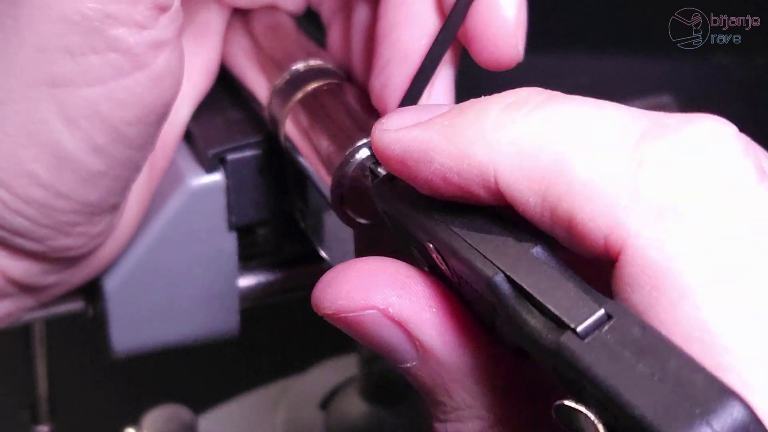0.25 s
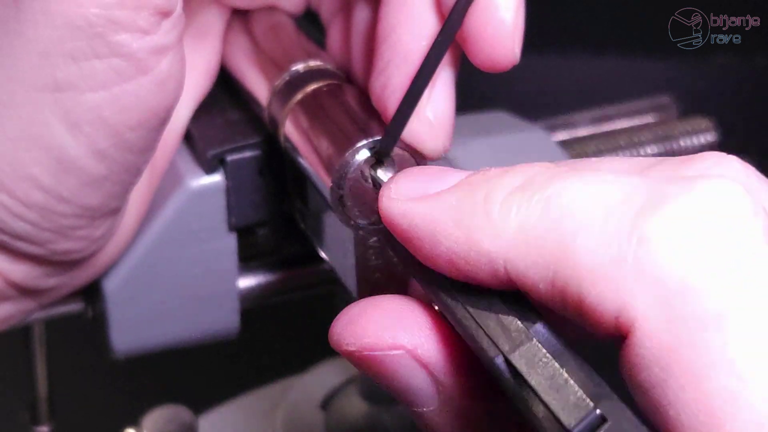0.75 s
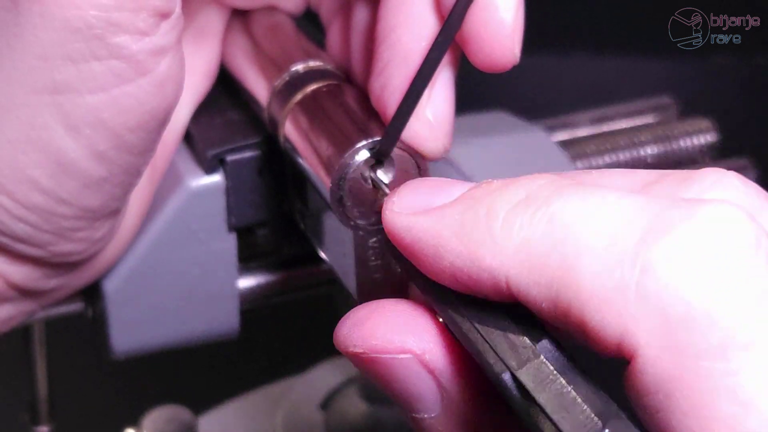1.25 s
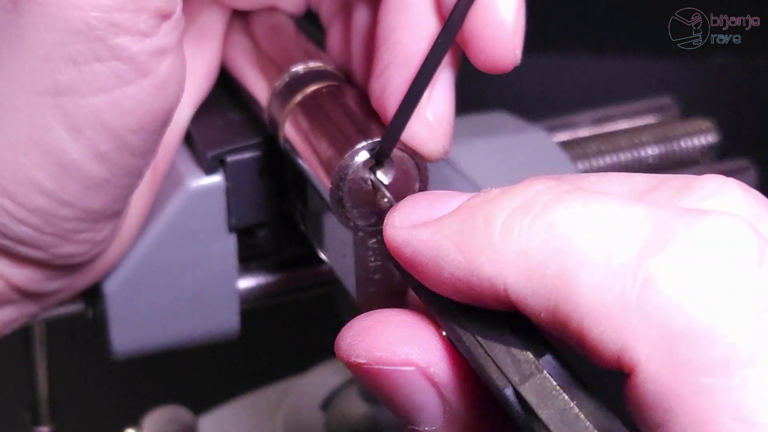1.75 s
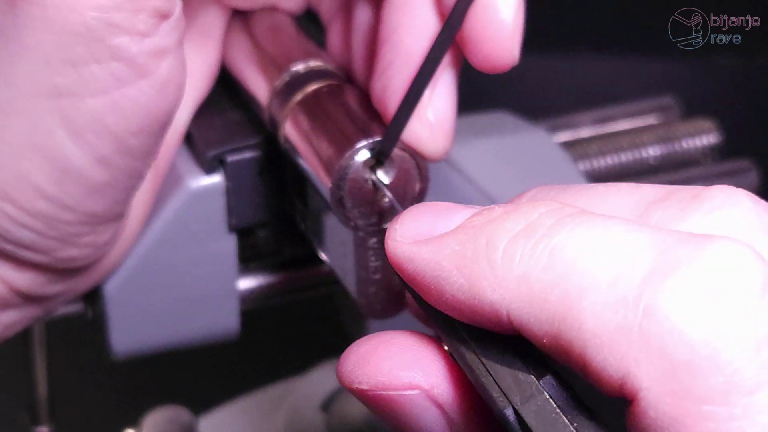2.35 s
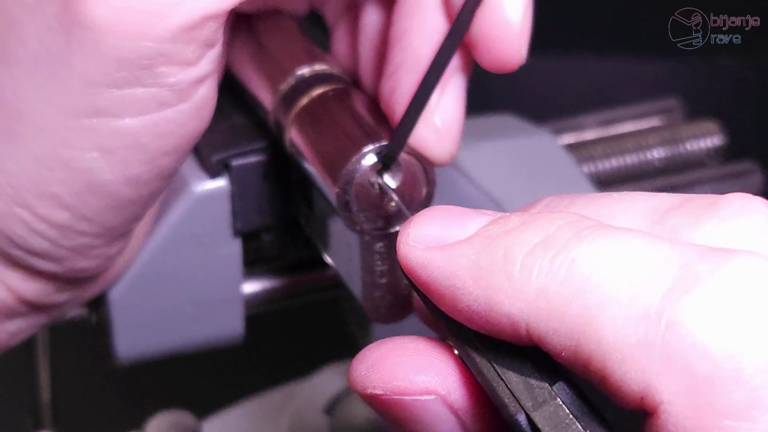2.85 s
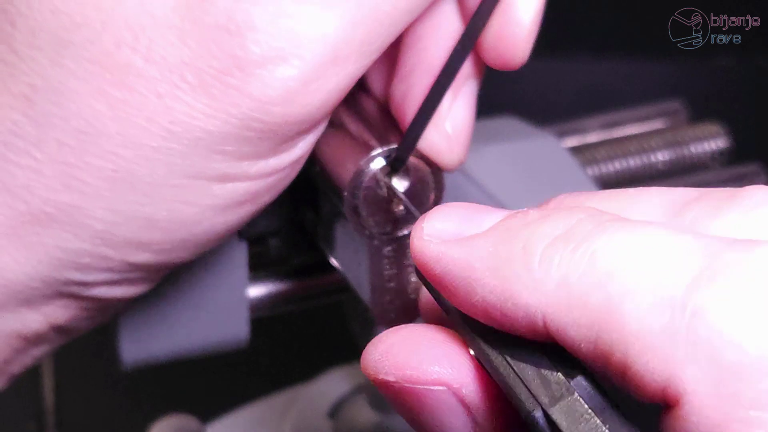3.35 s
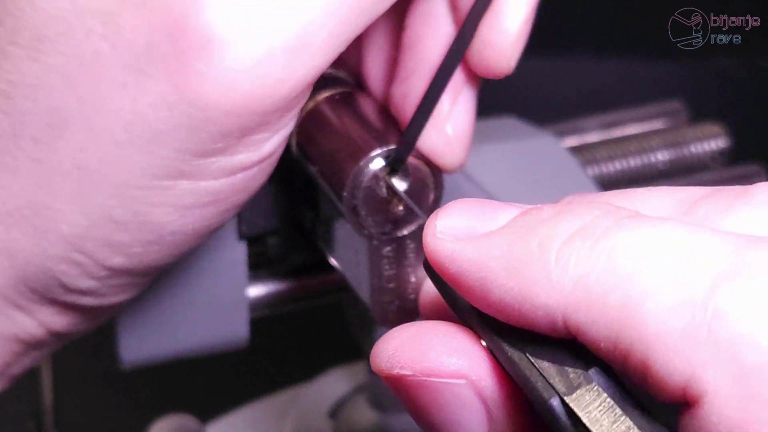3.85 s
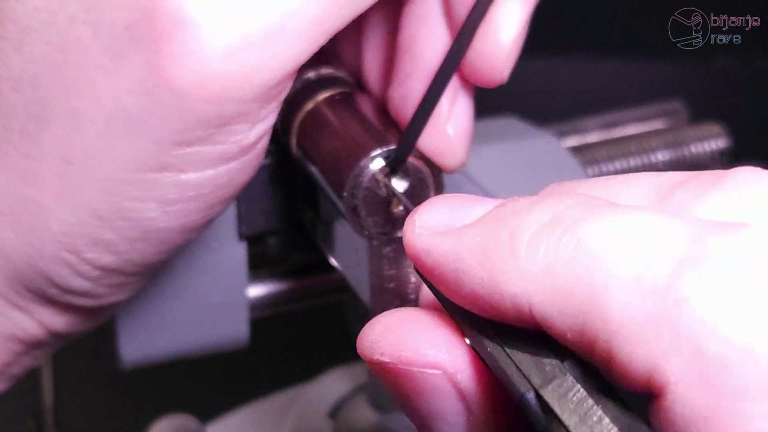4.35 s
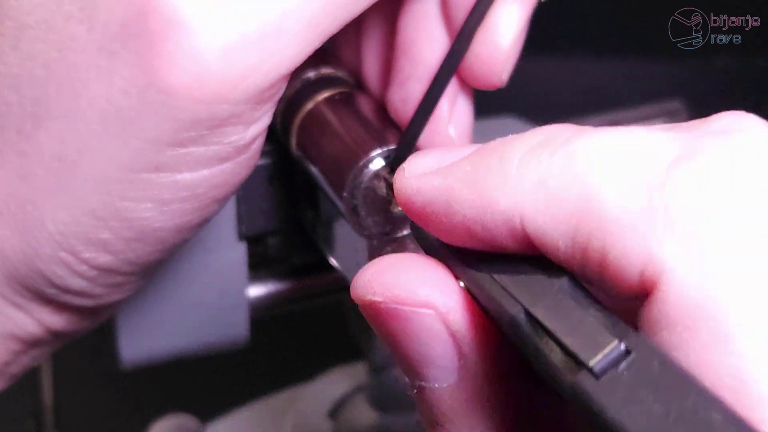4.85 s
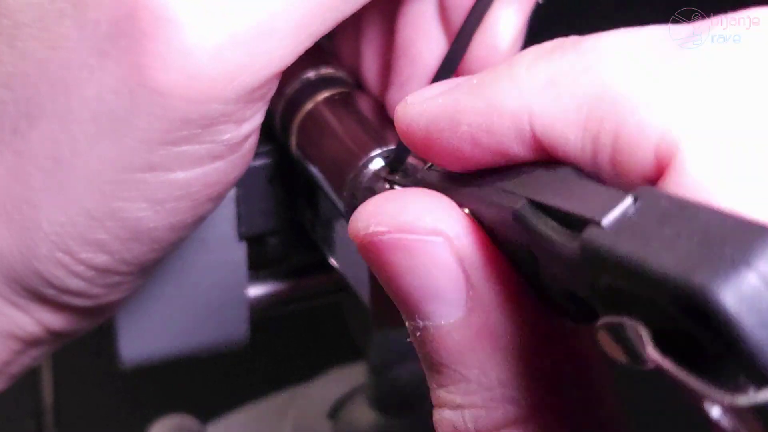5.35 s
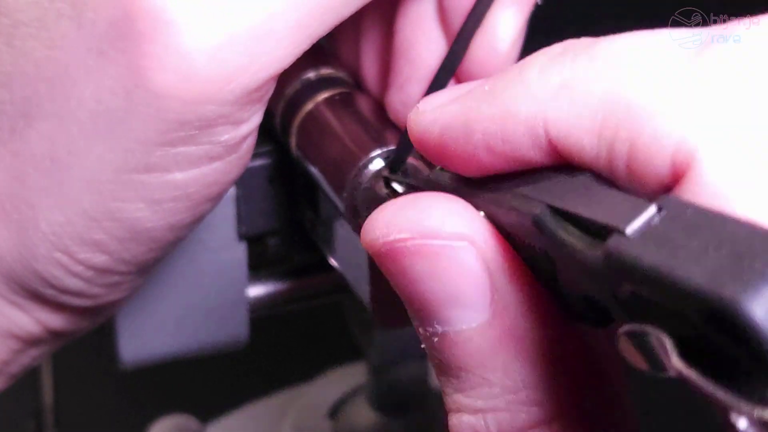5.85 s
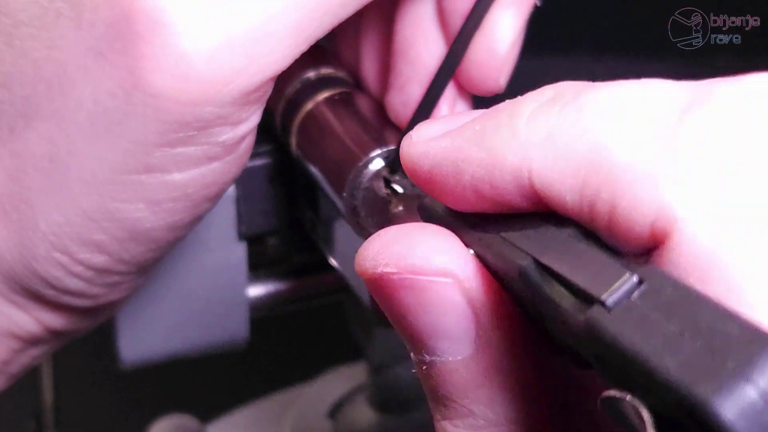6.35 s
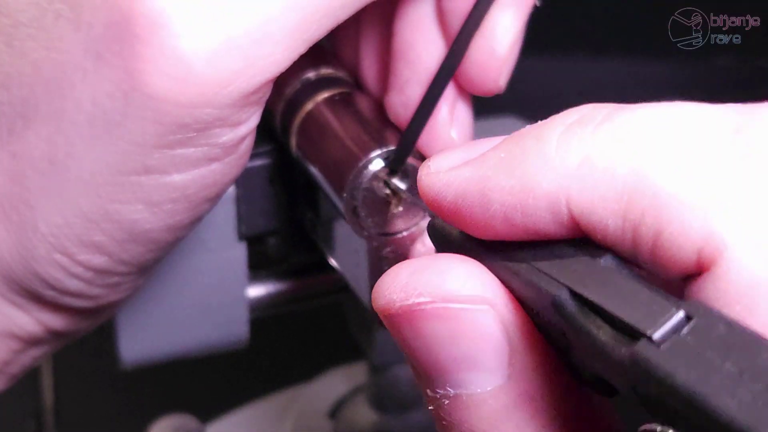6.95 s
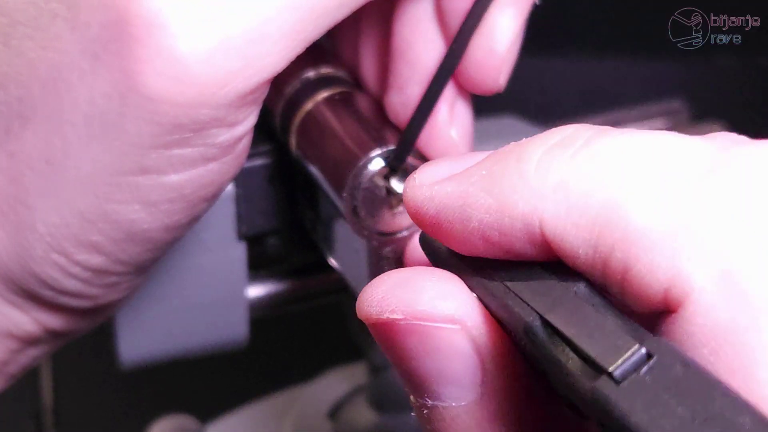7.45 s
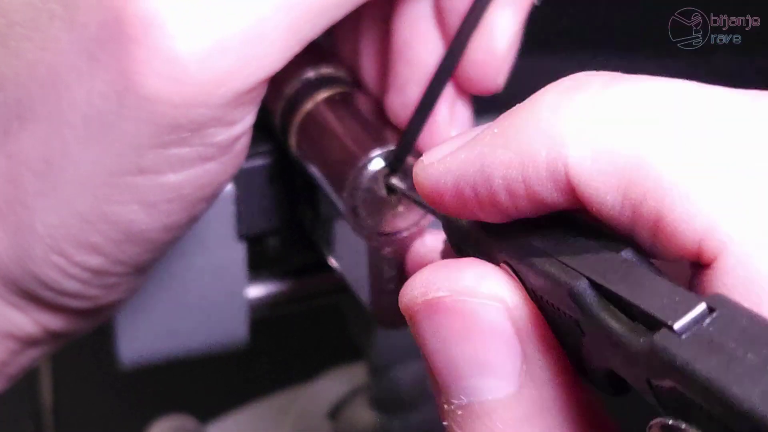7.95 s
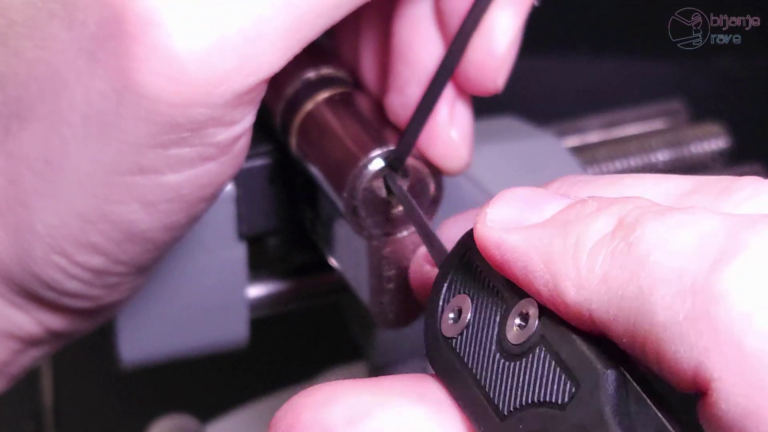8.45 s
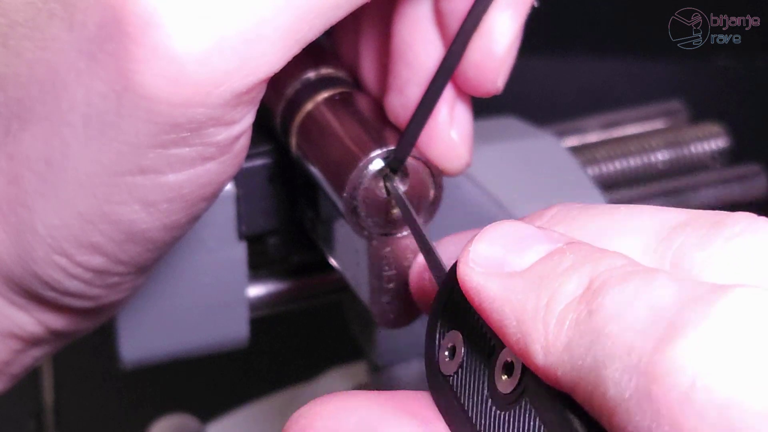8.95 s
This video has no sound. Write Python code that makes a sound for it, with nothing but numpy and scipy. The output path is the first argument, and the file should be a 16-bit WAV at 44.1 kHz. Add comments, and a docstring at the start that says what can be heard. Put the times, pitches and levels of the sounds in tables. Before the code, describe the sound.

Irregular little metal snaps and ticks, some crisp, many barely audible, come from a pick inside a lock. Dull woody knocks and short vise resonances sit beneath them, with scratchy drags, short gritty grinds and a few very faint squeaks between. Hands rustle and rumble close to the microphone. The room is small, dry and quiet, with a faint steady hum and hiss, and activity continues to the end.

```python
"""A steel pick works the pins of a brass cylinder lock, held in a bench vise close to a microphone.
From the start, shaped noise makes the air and the rubbing hands of a small room, over a faint sine hum.
Grainy impacts at once ring pick and pins in bright clicks; strokes ring the lock body, vise and bench.
The pick scrapes around clicks and in separate drags of grainy noise. Soon pins grind in trains of random
slips, later narrow noise bands squeak faintly, and the work goes on to a last stroke near the end."""
import sys
import numpy as np
from scipy import signal
from scipy.fft import rfft, irfft, next_fast_len
from scipy.io import wavfile
from scipy.ndimage import map_coordinates

SR = 44100
rng = np.random.default_rng(int(sys.argv[2]) if len(sys.argv) > 2 else 0)


def persist_wave(psi):
    """Save psi, clipped to +-1, as 16-bit WAV."""
    counts = np.round(np.clip(psi, -1, 1) * 32767).astype(np.int16)
    wavfile.write(sys.argv[1], SR, np.atleast_2d(counts).T)


N = 404838
LIFE = SR // 4  # samples that one blow lasts
FIRM_KNOCK_DB = -37  # thud of a firm stroke

# Steel contacts in the keyway. Each row: time in seconds, level of the middle modes in dB,
# brightness (highest modes over middle ones) in dB, slip before the blow in dB.
CLICKS = [(.007, -31.5, -7, 6), (0.188, -62.5, -18, -16), (0.274, -49, 5, -5), (0.372, -51.5, -11, 6),
          (0.4013, -32, -4.5, -19), (0.775, -61, -16, 19), (0.802, -48, -11, 0), (1.278, -54.5, -27, -8),
          (1.5388, -47.5, -9, -2), (1.7215, -27, 4, -7.5), (2.0726, -52.5, -17, 2),
          (2.2235, -49.5, -7, -17), (2.2457, -43.5, -4.5, -7.5), (2.4813, -59.5, -15, 4.5),
          (2.69, -38.5, -7, -10.5), (2.975, -57, -4, 27), (3.1173, -34, 2.5, -3), (3.44, -44.5, -6, 2.5),
          (3.465, -53.5, -8.5, 12), (3.549, -56, -9, -3), (4.0622, -28, 0.5, -9.5), (4.162, -52.5, -20, -3),
          (4.406, -50.5, -9, -23.5), (4.645, -57.5, -5, -7), (4.66, -47, -2, 11), (4.888, -50, -19, -4),
          (4.9, -47, -4, -13), (4.924, -50.5, -8.5, -6.5), (5.0828, -36, -6, -2), (5.407, -53.5, -9, 4.5),
          (5.423, -31, -9, -23), (5.501, -29.5, -10, -17), (5.6372, -45.5, -8, -2), (5.8907, -56, -21, -10),
          (6.067, -63, -8, -7), (6.1365, -61, -13, -17), (6.1874, -56, -27, 20), (6.378, -45.5, -18, -7),
          (6.4869, -43, -7, -11), (6.806, -62.5, -16, 9), (7.0818, -36.5, -8.5, -24.5),
          (7.1339, -32, -10, -5), (7.243, -48, -6, -14), (7.3103, -50, -5.5, -2), (7.3951, -55.5, -27.5, 4),
          (8.0347, -59, -3, -1.5), (8.054, -55, 0.5, -1), (8.063, -49.5, -15, -1), (8.1803, -47, -7.5, 3),
          (8.242, -47, -6, -13), (8.2623, -41.5, -10, -14), (8.391, -53.5, -10, -17.5),
          (8.9247, -41.5, -0.5, -18), (8.971, -45, -2.5, -7)]
# Strokes that jolt the lock. Each row: time in seconds, thud of the bench in dB,
# hardness (lock body over bench) in dB, twist (vise arm over bench) in dB.
KNOCKS = [(.01, -34, -13.5, -34), (.188, -34, -16.5, -4), (0.268, -40.5, -10, -9.5), (0.396, -40, -5, -1),
          (0.637, -44, -23, 0), (.693, -32.5, -25.5, -10), (0.802, -34.5, -23, -1.5), (0.833, -53.5, 8, 11),
          (1.165, -42.5, -23.5, -24), (1.275, -36.5, -14.5, -7.5), (1.541, -31, -20, -12),
          (1.572, -40, -27, -10), (1.609, -38, -31, -20), (1.717, -33.5, -12.5, -1.5),
          (1.931, -52.5, -4.5, -7.5), (2.047, -46, -3.5, -4), (2.074, -40, -13.5, -5),
          (2.227, -31.5, -17, -10.5), (2.247, -44.5, 1, 7), (2.474, -37, -28.5, -5),
          (2.533, -58.5, 3.5, -2), (2.687, -34.5, -21, -4.5), (2.967, -40.5, -22, -3),
          (3.117, -31.5, -17, -11.5), (3.442, -27, -9.5, -28), (3.477, -37.5, -12, 2.5),
          (3.575, -34, -26, -24), (3.915, -51, -26, 1), (4.059, -39, 4.5, 1.5), (4.411, -34, -13, -13),
          (4.556, -34, -33, -20), (4.658, -41, -21, -2.5), (4.747, -45, -21.5, -9.5),
          (4.903, -30, -5.5, -14), (4.926, -36, -7.5, -14), (5.044, -32, -37, -32),
          (5.086, -29.5, -11.5, -21.5), (5.406, -37, -0.5, 9.5), (5.424, -26, -20, -7),
          (5.502, -44, 3.5, 2), (5.644, -36.5, -23, -16.5), (5.876, -38, -42, -13.5),
          (5.931, -37.5, -23.5, -23), (6.019, -40.5, -43.5, -2.5), (6.188, -43.5, -20, -8.5),
          (6.296, -40, -22, -21), (6.38, -33, -7, -32), (6.484, -48, -7.5, -5), (6.519, -48.5, -30, -18),
          (6.807, -34.5, -36, -8.5), (7.09, -44.5, -16.5, -9), (7.133, -24, -12, -6.5),
          (7.394, -38, -38, -2.5), (7.76, -31.5, -44, -18), (7.902, -45.5, -34, -8.5),
          (8.064, -44, -45, 5.5), (8.19, -45.5, -56, -5), (8.253, -42.5, -37, -12),
          (8.383, -35.5, -20, -4.5), (8.492, -48.5, -14, -4.5), (8.591, -63, -2, -26),
          (8.923, -45.5, -6.5, 4.5), (8.969, -39.5, -12, -12), (9.081, -43, -12, -2)]
# Modes of the vise jaws. Each row: frequency in Hz, width in Hz, relative level in dB.
VISE = [(293, 18, -3), (369.8, 28, -1.5), (427.7, 35, 0.5), (441.8, 29, 6), (545, 24, -7.5)]
# Modes of the lock body. Each row: frequency in Hz, width in Hz, relative level in dB.
LOCK = [(757, 79, -2.5), (795, 40, -0.5), (928, 34, 12.5), (1018, 130, 4.5), (1131.6, 55, 7), (1437, 72, 4),
        (1556, 110, -2), (1960, 230, -13)]


def amp(db):
    """Decibels to gain."""
    return 10 ** (np.asarray(db) / 20)


def unit(x):
    """Scale to rms 1."""
    return x / np.sqrt(np.mean(x ** 2) + 1e-20)


def along(points, hz):
    """Read (Hz, value) points on a log axis."""
    f, v = np.transpose(points)
    return np.interp(np.log(hz + 1), np.log(f + 1), v)


def wobble(rate):
    """A smooth random curve, rate knots a second."""
    knots = rng.standard_normal(int(N * rate / SR) + 4)
    return map_coordinates(knots, [np.arange(N) * rate / SR])


def filtered(x, response):
    """x times a response of frequency."""
    m = next_fast_len(len(x) + SR // 10)
    hz = np.fft.rfftfreq(m, 1 / SR)
    return irfft(rfft(x, m) * response(hz), m)[:len(x)]


def coloured(x, spectrum):
    """x shaped by a spectrum, at rms 1."""
    return unit(filtered(x, lambda hz: amp(along(spectrum, hz))))


def within(x, lo_hz, hi_hz, order=3):
    """Causal band-pass."""
    band = [lo_hz, min(hi_hz, SR / 2 - 100)]
    return signal.sosfilt(signal.butter(order, band, "bandpass", fs=SR, output="sos"), x)


def add(track, s, x):
    """Mix x into the track at time s, or at the very start if s is negative."""
    part = track[max(0, round(s * SR)):][:len(x)]
    part += x[:len(part)]


def curves(rows):
    """One value per sample for each column after the time."""
    s, *columns = np.transpose(rows)
    return [np.interp(np.arange(N) / SR, s, c) for c in columns]


def swells(events, attack, release):
    """Gain that rises towards each (s, dB) event and falls away after it; overlaps add in power."""
    t = np.arange(0, N, 128) / SR
    s, db = np.transpose(events)[:, :, None]
    gains = amp(db) * np.exp(np.minimum((t - s) / attack, (s - t) / release))
    return np.interp(np.arange(N) / SR, t, np.linalg.norm(gains, axis=0))


def ring(drive, modes, scatter_db, detune):
    """Resonances whose strength and pitch vary at random from blow to blow."""
    moved = []
    for centre, width, db in modes:
        shift, scatter = rng.standard_normal(2)
        moved.append((centre * (1 + detune * shift), width, amp(db + scatter_db * scatter)))

    def response(f):
        total = 0
        for k, (c, w, gain) in enumerate(moved):
            sign = (-1) ** k  # alternate signs fill the valleys between modes
            total = total + sign * gain * 1j * f * w / (c * c - f * f + 1j * f * w)
        return total

    return filtered(drive, response)


def room(wet_db, build):
    """Direct sound plus a fresh tail that builds up and dies at each frequency's own speed."""
    # Decay of the small room. Each row: frequency in Hz, time to fall by 60 dB in seconds.
    decay = [(120, 0.29), (500, 0.24), (1500, 0.21), (4000, 0.19), (8000, 0.19), (15000, 0.24)]
    hz, t, z = signal.stft(rng.standard_normal(LIFE), SR, nperseg=256)
    fade = amp(-60 * t / along(decay, hz)[:, None]) * (1 - np.exp(-t / build))
    tail = signal.istft(z * fade, SR, nperseg=256)[1][:LIFE]
    return signal.unit_impulse(LIFE) + amp(wet_db) * tail / np.linalg.norm(tail)


def heard(x, space, db, first):
    """x in the room, with an rms of db over its first seconds."""
    x = signal.fftconvolve(x, space)[:LIFE]
    return amp(db) * x / np.sqrt(np.mean(x[:int(first * SR)] ** 2) + 1e-20)


def chatter(lead, settle, slip_db, spiky):
    """Tiny impacts: they grow as the pick slips, peak at the blow after lead seconds, settle in bounces."""
    slip_s, snap_s = .005, .0008  # time constants of the growing slip and of the main impact
    snap_db = 4  # the main impact over its bounces
    t = np.arange(LIFE) / SR - lead
    slip = amp(slip_db) * np.exp(-abs(t) / slip_s)
    blow = amp(snap_db) * np.exp(-abs(t) / snap_s) + np.exp(-abs(t) / settle)
    impacts = rng.standard_normal(LIFE) * np.exp(spiky * rng.standard_normal(LIFE))
    return np.where(t < 0, slip, blow) * np.tanh(unit(impacts) / 2)  # no single impact dwarfs the rest


def background(hum_hz=120, hum_db=-67):
    """Room air and microphone hiss as steady shaped noise, and a faint hum of slightly wavering level."""
    # Spectrum of air and hiss. Each row: frequency in Hz, relative density in dB per Hz.
    air = [(12, -45.5), (20, 6.5), (123, -17), (172, -10), (270, -11), (337, -20), (459, -19.5), (802, -29),
           (1150, -25.5), (1960, -32.5), (4670, -32), (9670, -38), (14300, -34), (16000, -42)]
    air_db = -61.5
    sine = np.sqrt(2) * np.sin(2 * np.pi * hum_hz * np.arange(N) / SR)
    hum = amp(hum_db + 1.5 * wobble(9)) * sine
    return hum + amp(air_db) * coloured(rng.standard_normal(N), air)


def sliding():
    """Resting hands rumble and rub, more as they lean into strokes; the pick drags over brass in fine grains."""
    # Hands at rest. Each row: time in seconds, rumble of the hands in dB, rub of the skin in dB,
    # both before the rest offsets below.
    grip = [(0.0, -41, -73), (0.28, -74, -47), (0.64, -50, -70.5), (0.82, -52, -45.5), (1.51, -64, -65),
            (1.74, -63, -55.5), (3.35, -59.5, -58.5), (3.94, -57, -51), (4.45, -62, -64),
            (4.58, -48.5, -44.5), (6.16, -63.5, -62), (6.52, -41.5, -43.5), (7.03, -67, -63),
            (7.29, -43.5, -45), (7.52, -56.5, -65), (8.28, -47, -48), (8.69, -64, -64.5), (9.18, -65, -49)]
    # Spectra of rumble, rub and scrape. Each row: frequency in Hz, relative density in dB per Hz.
    rumble_spectrum = [(20, -32), (50, 2), (90, -2), (130, -3), (175, -18.5), (300, -35.5), (1000, -89)]
    rub_spectrum = [(100, -28), (180, -9), (270, 1.5), (340, -8), (480, -9), (650, -31), (1100, -28),
                    (2200, -48.5), (5000, -56.5)]
    scrape_spectrum = [(1200, -30.5), (3000, -0.5), (4200, 4), (6200, -1), (8400, 5), (9500, -12),
                       (11000, -13), (14500, -20.5), (16000, -22.5)]
    # Separate drags of the pick along the keyway. Each row: time in seconds, level in dB.
    separate_drags = [(.23, -66), (.68, -66.5), (1.57, -60), (2.05, -63), (2.75, -67.5), (2.98, -59),
                      (3.42, -61), (4.59, -61.5), (5.06, -69), (5.53, -44.5), (6.69, -72), (7.39, -67),
                      (7.74, -68.5), (8.0, -68), (8.33, -59.5), (9.08, -69.5)]
    rumble_rest_db, rub_rest_db = 2.5, -2  # between strokes, over the grip
    rumble_stroke_db, rub_stroke_db = -52.5, -48  # in a firm stroke
    lean_follows = 1  # dB more rumble and rub for each dB of thud
    firm_click_db, firm_drag_db = -45, -69  # a firm click, and the drag around it before its slip counts
    drag_follows, drag_slips = .55, .3  # dB more drag for each dB of the click and of its slip

    rumble_db, rub_db = curves(grip)
    strokes = [(s, lean_follows * (db - FIRM_KNOCK_DB)) for s, db, *_ in KNOCKS]
    lean = swells(strokes, attack=.018, release=.042)
    click_drags = []
    for s, db, _, slip_db in CLICKS:
        drag_db = firm_drag_db + drag_follows * (db - firm_click_db) + drag_slips * slip_db
        click_drags.append((s, drag_db))
    drag = swells([*separate_drags, *click_drags], attack=.032, release=.045)

    def lumps(spectrum):
        return coloured(rng.standard_normal(N) * amp(4.5 * wobble(25)), spectrum)

    # rest and stroke add in power
    rumble_gain = np.hypot(amp(rumble_db + rumble_rest_db), amp(rumble_stroke_db) * lean)
    rub_gain = np.hypot(amp(rub_db + rub_rest_db), amp(rub_stroke_db) * lean)
    hands = rumble_gain * lumps(rumble_spectrum) + rub_gain * lumps(rub_spectrum)
    grains = rng.standard_normal(N) * amp(4 * wobble(400) + 3 * wobble(50))
    return hands + drag * coloured(grains, scrape_spectrum)


def clicks():
    """Pick and pins snap together: raw crack and brief ring, with more clack the heavier the nearest stroke."""
    # Modes of pick and pins. Each row: frequency in Hz, width in Hz, relative level in dB.
    steel_modes = [(1480, 100, -11), (2800, 630, -3), (3105, 280, 2.5), (3630, 83, -25.5), (4640, 350, -4),
                   (4420, 350, 6.5), (5930, 610, -10), (5860, 530, 2), (6760, 1700, 0), (6900, 120, 2),
                   (8430, 1700, 0), (8650, 340, -1), (10300, 370, -6.5), (13880, 280, -10.5),
                   (13400, 290, -15.5), (14200, 210, 6), (14670, 100, -30), (15100, 140, -10)]
    clack_crack_db = -3.5  # raw crack mixed with the ring, ahead of the clack's band
    firm_clack_db, clack_grows = -11, .56  # clack over the click in a firm stroke; dB more per dB of thud
    lead, first = .012, .021  # seconds before the blow, and over which the level is set
    out = np.zeros(N)
    for s, db, bright_db, slip_db in CLICKS:
        thud_db = min(KNOCKS, key=lambda stroke: abs(stroke[0] - s))[1]
        clack_db = db + firm_clack_db + clack_grows * (thud_db - FIRM_KNOCK_DB)
        drive = chatter(lead, settle=.0058, slip_db=slip_db, spiky=.67)
        modes = ring(drive, steel_modes, scatter_db=3, detune=.013)
        steel = modes + amp(-16) * drive
        shaft = within(modes + amp(clack_crack_db) * drive, 1500, 5000)
        clack = heard(shaft, room(wet_db=-3.5, build=.005), clack_db, first)
        click = heard(within(steel, 5000, 9000, order=5), room(wet_db=-6, build=.005), db, first)
        highest = within(steel, 11500, 16300, order=3)
        tick = heard(highest, room(wet_db=-9, build=.005), db + bright_db, first)
        add(out, s - lead, clack + click + tick)
    return out


def knocks():
    """A stroke strikes the lock body; the vise jaws take up a slower push, vise arm and bench ring from a jolt."""
    # Modes of the vise arm and of the bench. Each row: frequency in Hz, width in Hz, relative level in dB.
    arm_modes = [(197.8, 17, -5.5), (220.3, 14.8, 1)]
    bench_modes = [(84, 17, -12), (130.86, 8.4, 1.5)]
    lock_top_hz = 2600  # upper reach of the hardest strokes; it falls as the contact softens
    firm_crack_db, crack_grows = -17.5, .25  # dry crack over a firm lock ring; dB more per dB of that ring
    firm_jaw_db, jaw_follows, jaw_hardens = -37.5, .88, .61  # jaws; dB more per dB of thud and of hardness
    lead, short, long = .012, .032, .05  # seconds before the blow, and over which levels are set
    out, t = np.zeros(N), np.arange(LIFE) / SR
    jolt = signal.unit_impulse(LIFE)
    for s, db, hard_db, twist_db in KNOCKS:
        lock_db = db + hard_db
        crack_db = lock_db + firm_crack_db + crack_grows * (lock_db - FIRM_KNOCK_DB)
        jaw_db = firm_jaw_db + jaw_follows * (db - FIRM_KNOCK_DB) + jaw_hardens * hard_db
        soft = np.clip(-lock_db / 42, 1, 2)  # gentle strokes stay in contact longer

        contact = chatter(lead, settle=.0017 * soft, slip_db=-8, spiky=.13)
        body = ring(contact, LOCK, scatter_db=2.5, detune=.01) + amp(-14) * contact
        lock = within(body, 660, lock_top_hz / soft)
        crack = within(contact, 1500, 2500, order=2)
        space = room(wet_db=-7.5, build=.0036)
        add(out, s - lead, heard(lock, space, lock_db, short) + heard(crack, space, crack_db, short))

        rise = .0035 * soft  # seconds to the strongest push
        push = rng.standard_normal(LIFE) * t / rise * np.exp(-t / rise)
        jaw = within(ring(push, VISE, scatter_db=2.5, detune=.015) + amp(-18) * push, 255, 600)
        add(out, s, heard(jaw, room(wet_db=-4, build=.0051), jaw_db, long))

        arm = within(ring(jolt, arm_modes, scatter_db=3, detune=.015), 160, 290, order=2)
        bench = within(ring(jolt, bench_modes, scatter_db=3, detune=.015), 62, 190, order=2)
        space = room(wet_db=-13.5, build=.01)
        add(out, s - .002, heard(arm, space, db + twist_db, long) + heard(bench, space, db, long))
    return out


def grinds():
    """A binding pin sticks and slips many times, shaking the lock body and the vise."""
    # Pins grinding through the brass. Each row: start in seconds, length in seconds,
    # lock body level in dB, vise level in dB.
    binding_pins = [(0.671, 0.041, -63, -44.5), (0.795, 0.032, -66, -52), (1.576, 0.058, -72, -46),
                    (1.663, 0.023, -70.5, -43), (2.01, 0.1, -57.5, -39), (2.263, 0.036, -63, -72),
                    (2.476, 0.099, -67.5, -46.5), (3.454, 0.063, -41, -37), (4.426, 0.061, -53, -44),
                    (4.914, 0.066, -48, -64.5), (5.092, 0.032, -52, -37), (5.382, 0.067, -41, -41.5),
                    (5.901, 0.049, -60, -47.5), (6.384, 0.11, -56.5, -59), (6.469, 0.12, -68, -52.5),
                    (7.724, 0.046, -61.5, -56), (8.368, 0.037, -66, -47)]
    slip_rate = 600  # mean slips a second
    out = np.zeros(N)
    for s, length, lock_db, vise_db in binding_pins:
        swell = np.sin(np.pi * np.minimum(np.arange(LIFE) / SR / length, 1))
        slips = (rng.random(LIFE) < slip_rate / SR) * rng.standard_normal(LIFE) * swell
        grit = amp(-13.5) * within(slips, 600, 2100, order=2)
        # slow slips are soft blows: they miss the body's highest modes
        lock = within(ring(slips, LOCK, scatter_db=2, detune=.01), 600, 1500, order=1) + grit
        vise = ring(slips, VISE, scatter_db=2, detune=.02)
        space = room(wet_db=-10, build=.008)
        add(out, s, heard(lock, space, lock_db, length) + heard(vise, space, vise_db, length))
    return out


def squeaks(width=0.051):
    """Light sliding sings for a moment in a narrow, rough band."""
    # Faint squeaks of metal on metal. Each row: start in seconds, length in seconds,
    # pitch in Hz, level in dB.
    sung_slides = [(3.721, 0.11, 1215, -65.5), (4.538, 0.27, 4000, -72), (6.525, 0.21, 4080, -68),
                   (6.915, 0.19, 1210, -74), (6.93, 0.14, 1805, -71.5), (8.78, 0.26, 1160, -66.5)]
    out = np.zeros(N)
    for s, length, hz, db in sung_slides:
        count = int(length * SR)
        noise = rng.standard_normal(count)
        band = unit(within(noise, hz / (1 + width), hz * (1 + width), order=2))
        add(out, s, amp(db) * np.sqrt(np.hanning(count)) * band)
    return out


def scene():
    """Everything at one close microphone."""
    return (background() + sliding() + clicks() + knocks() + grinds() + squeaks())[None]


def record(dry):
    """A very steep low-pass leaves almost nothing above the recorder's band limit."""
    top_hz = 15900
    return np.array([filtered(x, lambda hz: 1 / (1 + (hz / top_hz) ** 120)) for x in dry])


dry = scene()
out = record(dry)
persist_wave(out)
```